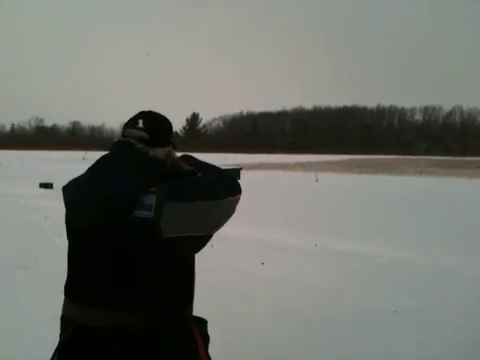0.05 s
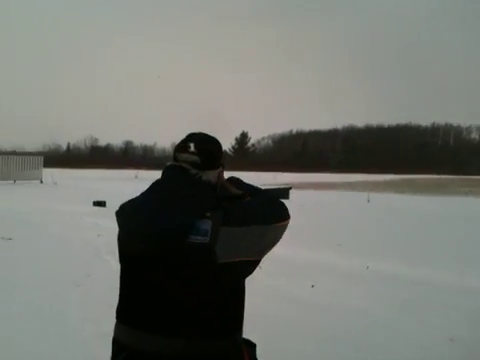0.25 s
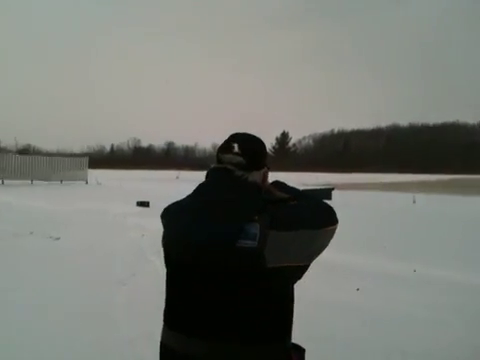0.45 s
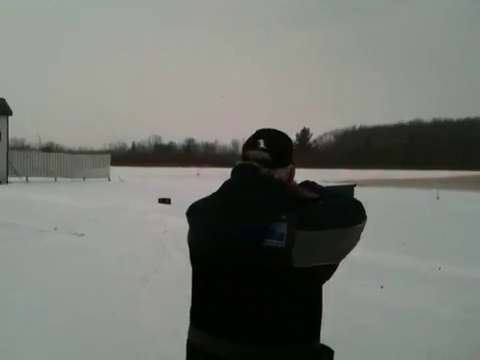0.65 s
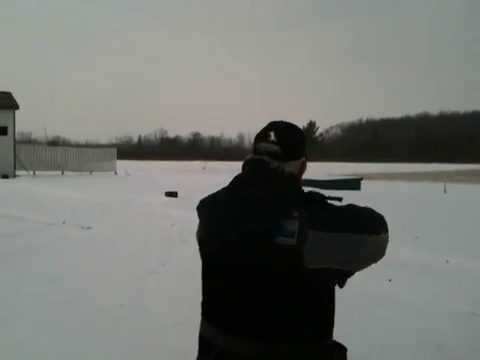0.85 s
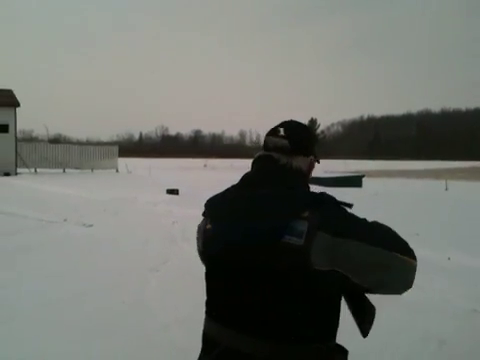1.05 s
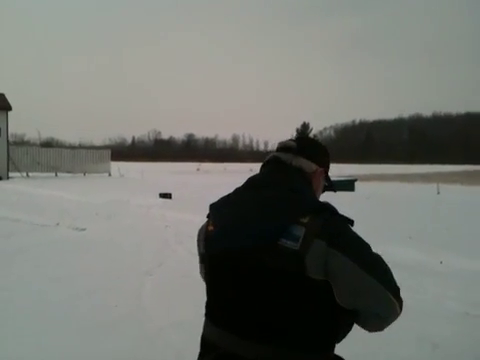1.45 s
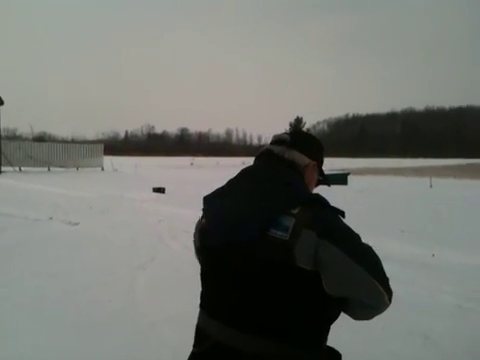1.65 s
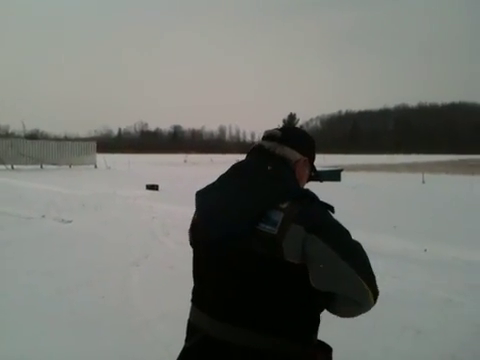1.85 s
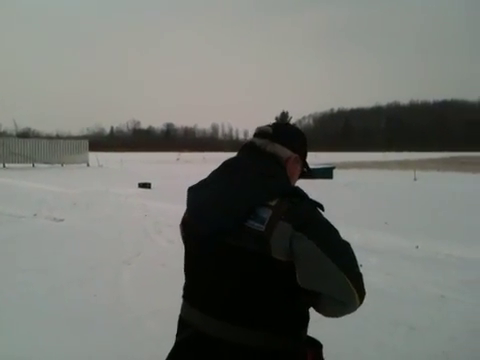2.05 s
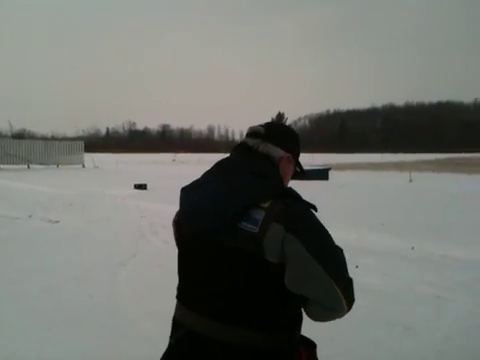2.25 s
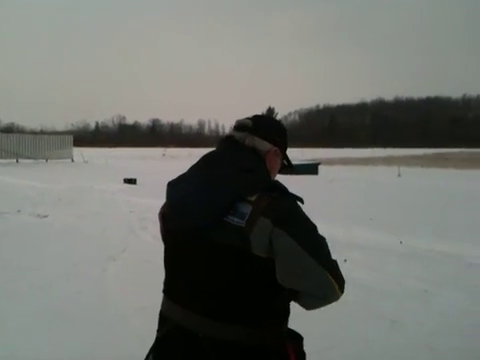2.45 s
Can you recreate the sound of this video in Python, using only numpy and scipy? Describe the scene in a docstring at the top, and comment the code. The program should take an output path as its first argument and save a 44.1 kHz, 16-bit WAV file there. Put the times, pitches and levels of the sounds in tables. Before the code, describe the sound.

One loud shotgun shot outdoors, with slapping echoes, a fading roll and faint gun clicks.

```python
"""A shotgun blast, a sudden pressure pulse, crosses a snowy clay range and overloads the microphone.
Reflection returns it as slaps between the buildings, zings off a ribbed fence, diffuse scatter and
a roll from the far wood, while a thin whistle rings on. Just before the shot the trap's arm clatters.
Afterwards the shooter lowers the gun: friction rustles his jacket and small impacts make the action
click, over faint wind, hiss and hum."""
import sys
import numpy as np
from scipy import signal
from scipy.fft import rfft, irfft
from scipy.io import wavfile

SR = 44100
rng = np.random.default_rng(int(sys.argv[2]) if len(sys.argv) > 2 else 0)


def int16_out(signal):
    """Quantize to a 16-bit WAV file."""
    q = np.round(np.clip(np.atleast_2d(signal).T, -1, 1) * 32767)
    wavfile.write(sys.argv[1], SR, q.astype(np.int16))


N = 110250
T = np.arange(N) / SR
BIN_HZ = np.arange(N // 2 + 1) * SR / N


def from_db(db):
    """Amplitude ratio: tenfold for every 20 dB."""
    return 10 ** (np.asarray(db) / 20)


def unit_rms(x):
    """Normalisation to unit mean power."""
    return x / np.sqrt(np.mean(x ** 2) + 1e-20)


def level(rows, column=1):
    """Gain over time, by linear interpolation in decibels."""
    rows = np.array(rows)
    return from_db(np.interp(T, rows[:, 0], rows[:, column]))


def at_hz(points, hz):
    """Interpolation on a logarithmic frequency axis."""
    points = np.array(points)
    return np.interp(np.log(hz + 1e-6), np.log(points[:, 0]), points[:, 1])


def drift(rate_hz):
    """Random fluctuation: low-passed noise of unit rms."""
    return unit_rms(irfft(rfft(rng.standard_normal(N)) / (1 + (BIN_HZ / rate_hz) ** 2), N))


def noise(spectrum, resonances=(), bass_db=0, treble_db=0):
    """Source and filter: white noise shaped by a spectrum and resonances at unit power, then shelved."""
    peaks_db = sum(boost / (1 + (2 * (BIN_HZ - hz) / width) ** 2) for hz, width, boost in resonances)
    colour = unit_rms(from_db(at_hz(spectrum, BIN_HZ) + peaks_db))
    shelves_db = bass_db / (1 + (BIN_HZ / 450) ** 4) + treble_db * (1 - 1 / (1 + (BIN_HZ / 3800) ** 4))
    return irfft(rfft(rng.standard_normal(N)) * colour * from_db(shelves_db), N)


def envelope(start, attack, hold, t60):
    """Linear rise, hold, then exponential damping by 60 dB in t60 seconds."""
    age = T - start
    decay = np.exp(-np.log(1000) * np.clip((age - attack - hold) / t60, 0, 2))
    return np.clip(age / attack, 0, 1) * decay


def arrivals(rows, spectrum, resonances, attack):
    """Multipath propagation: each path delivers a noise burst with its own delay and tone balance."""
    return sum(from_db(db) * envelope(start, attack, hold, t60) * noise(spectrum, resonances, bass, treble)
               for start, db, hold, t60, bass, treble in rows)


def wave_packets(rows, pitch_spread):
    """Narrow-band pulses: tones of randomly wandering pitch under Gaussian envelopes."""
    out = 0
    for centre, db, hz, sigma in rows:
        phase = 2 * np.pi * np.cumsum(hz * (1 + pitch_spread * drift(hz / 4))) / SR
        swell = np.exp(-.5 * ((T - centre) / sigma) ** 2)
        out = out + from_db(db) * swell * np.sqrt(2) * np.sin(phase)
    return out


# Spectra of wind and hiss: (frequency [Hz], relative level [dB])
WIND_SPECTRUM = [(20, -32), (55, -22), (85, -11), (125, -0.5), (200, -3), (400, -3.5), (750, -2),
                 (1400, -11), (2200, -15), (4000, -35.5), (16000, -46.5)]
HISS_SPECTRUM = [(40, -32.5), (120, -8.5), (400, -2), (900, -2), (1500, -2), (2000, -0.5), (2500, -0.5),
                 (3300, -6.5), (4000, -12.5), (6000, -10.5), (8000, -9.5), (11000, -19.5), (16000, -24)]
# Hiss, which sinks after the shot and recovers: (time [s], level [dB])
HISS_LEVEL = [(0, -59), (0.15, -63), (0.22, -56), (0.30, -75), (1.45, -74.5), (1.7, -60), (2.1, -63.5),
              (2.5, -67)]

def background():
    """Superposition of faint, fluctuating wind noise, broadband hiss and a low hum."""
    wind = from_db(-61) * noise(WIND_SPECTRUM) * from_db(.8 * drift(12))
    hiss = level(HISS_LEVEL) * noise(HISS_SPECTRUM)
    hum = from_db(-72) * np.sqrt(2) * np.sin(2 * np.pi * 120.6 * T)
    return wind + hiss + hum


# Rustle of the cloth: (time [s], level [dB]) and (frequency [Hz], relative level [dB])
RUSTLE_LEVEL = [(1.48, -95), (1.58, -61), (1.7, -61.5), (1.79, -58.5), (1.84, -52), (1.93, -50.5),
                (1.99, -48), (2.04, -54), (2.09, -56), (2.17, -58.5), (2.24, -53), (2.28, -63),
                (2.34, -62.5), (2.40, -64.5)]
RUSTLE_SPECTRUM = [(40, -35), (120, -14), (600, 3), (1400, -2), (1950, -1), (2450, 1.5), (3000, -3),
                   (4500, -8.5), (6500, -9.5), (8200, -11.5), (10500, -9), (13000, -18), (16000, -28)]
# Modes of the sliding steel: (frequency [Hz], width [Hz], boost [dB])
STEEL_MODES = [(2490, 170, 7), (3000, 120, 4), (3650, 250, 4), (4400, 300, 3)]

def jacket_rustle():
    """Friction: the gun slides along the sleeve, making rough noise that faintly rings the steel."""
    return level(RUSTLE_LEVEL) * noise(RUSTLE_SPECTRUM, STEEL_MODES) * from_db(1.5 * drift(120))


# Impacts in the gun: (time [s], level [dB], t60 [s], ring frequency [Hz], knock re ring [dB])
GUN_CLICKS = [(1.527, -47.5, 0.022, 4450, -1), (1.5392, -47, 0.037, 4350, -13),
              (1.8503, -54.5, 0.041, 3700, 6), (1.872, -55.5, 0.036, 4400, 3),
              (1.9443, -48, 0.013, 4400, 3), (1.9980, -38, 0.011, 4480, -19),
              (2.1813, -49, 0.036, 2600, 6.5), (2.2056, -52, 0.085, 4700, -3),
              (2.218, -53, 0.068, 4500, -1), (2.2370, -43, 0.028, 3800, -0.5),
              (2.3142, -57.5, 0.069, 2950, 11), (2.335, -54, 0.067, 4350, 6),
              (2.4877, -46.5, 0.022, 4620, -10)]
# Broad knock: (frequency [Hz], relative level [dB])
KNOCK_SPECTRUM = [(60, -27), (300, -4), (750, 5.5), (1700, -14), (2450, 6.5), (3200, -11), (4200, -5.5),
                  (7000, -9), (11000, -12), (16000, -28)]
# Ring of a click: (multiple of the ring frequency [1], relative level [dB])
RING_SPECTRUM = [(.3, -22), (.55, -10), (.72, -8), (.9, -5.5), (1.0, 2), (1.09, -2), (1.2, -23), (2.5, -22),
                 (4.0, -42)]

def gun_clicks():
    """Impact excitation: steel parts meet, each with a damped ring and a broadband knock."""
    knock, out = noise(KNOCK_SPECTRUM), 0
    for start, db, t60, hz, knock_db in GUN_CLICKS:
        ring = noise(np.array(RING_SPECTRUM) * [hz, 1])
        out = out + from_db(db) * envelope(start, .00066, .001, t60) * (ring + from_db(knock_db) * knock)
    return out


# Clatter of the trap: (frequency [Hz], relative level [dB])
TRAP_SPECTRUM = [(60, -25), (200, -8.5), (680, -19), (760, 7.5), (850, -14.5), (1300, -7.5), (1750, 2.5),
                 (2300, -10.5), (2800, -9), (5000, -20), (6200, -18.5), (11000, -27.5), (16000, -36)]

def trap_clatter():
    """Damped vibration: the throwing arm clatters in its house."""
    return from_db(-42) * envelope(start=.109, attack=.006, hold=.014, t60=.2) * noise(TRAP_SPECTRUM)


# Roll from the tree line: (time [s], level [dB]) and (frequency [Hz], relative level [dB])
ROLL_LEVEL = [(0.75, -66), (0.89, -55.5), (0.96, -45.5), (1.02, -42), (1.08, -40), (1.2, -42),
              (1.32, -44.5), (1.40, -43.5), (1.50, -45.5), (1.58, -50), (1.8, -58), (2.1, -49.5),
              (2.3, -53), (2.5, -61)]
ROLL_SPECTRUM = [(60, -34), (250, -24.5), (500, -13.5), (850, 2), (1400, 3), (2000, -4), (2800, -6),
                 (4000, -20.5), (7000, -27.5), (12000, -40.5), (16000, -48.5)]
TAIL_START_S = .238  # onset of roll, whistle and scatter

def far_wood(dulling_db_per_s=21.5, dulling_from_s=1):
    """Absorption along the path: the wood's grainy return is duller the farther it has travelled."""
    roll = noise(ROLL_SPECTRUM)
    low = irfft(rfft(roll) / (1 + (BIN_HZ / 2250) ** 2) ** 2, N)
    treble_gain = from_db(-dulling_db_per_s * np.maximum(T - dulling_from_s, 0))
    dulled = low + treble_gain * (roll - low)
    return level(ROLL_LEVEL) * (T > TAIL_START_S) * dulled * from_db(1.4 * drift(50))


# Partials of the whistle: (time [s], fundamental level [dB], octave level [dB])
WHISTLE_LEVELS = [(0.37, -54.5, -52.5), (0.405, -26.5, -35), (0.45, -60, -43), (0.48, -34, -51),
                  (0.525, -35.5, -43), (0.63, -42, -43), (0.675, -31, -38.5), (0.72, -33, -45),
                  (0.80, -39, -49.5), (0.84, -35, -47.5), (0.89, -48.5, -59.5), (0.93, -48, -60.5),
                  (1.06, -65, -85), (1.13, -96, -100)]

def whistle(pitch_hz=5528, beat_hz=125.5):
    """Beating: a thin tone and its octave settle upward, each interfering with a weaker neighbour."""
    flat_hz = 65 * np.exp(-np.maximum(T - .41, 0) / .05)
    phase = 2 * np.pi * np.cumsum(pitch_hz - flat_hz + 4 * drift(25)) / SR
    beat = 1 + from_db(-17.5) * np.exp(2j * np.pi * beat_hz * T)
    tones = 0
    for k in (1, 2):
        flutter = k * .2 * (drift(90) + 1j * drift(90))  # in both amplitude and phase
        tones = tones + level(WHISTLE_LEVELS, column=k) * np.exp(1j * k * phase) * (beat + flutter)
    shimmer = from_db(1.05 * drift(35))
    return np.sqrt(2) * tones.real * shimmer * (T > TAIL_START_S)


# Low pulses: (peak time [s], level [dB], frequency [Hz], Gaussian sigma [s])
LOW_THUDS = [(0.245, -14, 255, 0.0065), (0.545, -51.5, 140, .018), (0.615, -55, 280, 0.017),
             (0.699, -38.5, 402.6, 0.0024), (0.711, -31, 480.8, 0.0055), (2.345, -59.5, 270, 0.018)]

def thuds():
    """Pulses of only a few cycles are heard as thuds, not pitches; the first is from the muzzle."""
    return wave_packets(LOW_THUDS, pitch_spread=.2)


# Returns from the fence: (peak time [s], level [dB], frequency [Hz], Gaussian sigma [s])
FENCE_ZINGS = [(0.366, -18.5, 1050, .007), (0.380, -22, 2300, 0.0046), (0.391, -16.5, 800, 0.0022),
               (0.495, -12, 2850, 0.0046)]

def fence_zings():
    """Periodic reflection: the fence's ribs return the shot as brief, pitched metallic zings."""
    return wave_packets(FENCE_ZINGS, pitch_spread=.055)


# Early scatter: (frequency [Hz], relative level [dB]) and (frequency [Hz], t60 [s])
EARLY_SPECTRUM = [(25, -37), (75, -28.5), (130, -7), (260, -4.5), (500, 5), (900, 0), (1400, 1), (2600, -1),
                  (4500, -7.5), (7000, -5.5), (11000, -7.5), (16000, -28)]
EARLY_T60 = [(40, .5), (150, .5), (400, .68), (1000, 1), (2600, 1.0), (5000, .85), (9000, .68), (16000, .5)]
# Late scatter: (time [s], level [dB]) and (frequency [Hz], relative level [dB])
LATE_LEVEL = [(0.33, -57), (0.365, -22), (0.42, -23), (0.48, -13), (0.505, -21), (0.52, -33), (0.56, -27.5),
              (0.63, -45.5), (0.72, -37.5), (0.82, -45.5), (0.89, -55.5), (1.1, -110)]
LATE_SPECTRUM = [(60, -41), (300, -16), (700, -6.5), (1400, 3.5), (2700, -1.5), (4200, -8), (8000, -17.5),
                 (12000, -32.5), (16000, -41)]
# Resonances of both the blast and its scatter: (frequency [Hz], width [Hz], boost [dB])
SHOT_RESONANCES = [(1412, 130, 4), (1850, 27, 6.5), (2600, 100, 7), (3830, 170, 3), (6410, 300, 5.5),
                   (6810, 80, 7)]

def scatter():
    """Diffuse reflection from ground and fence: bass and treble die first, and more swells in late."""
    spectrum, early = rfft(noise(EARLY_SPECTRUM, SHOT_RESONANCES)), 0
    centres_hz = np.geomspace(40, 16000, 14)
    band_index = np.interp(np.log(BIN_HZ + 1), np.log(centres_hz), np.arange(len(centres_hz)))
    for k, hz in enumerate(centres_hz):
        band = irfft(spectrum * np.maximum(1 - abs(band_index - k), 0), N)  # triangular passband
        early = early + band * envelope(TAIL_START_S, attack=.0006, hold=0, t60=at_hz(EARLY_T60, hz))
    late = level(LATE_LEVEL) * (T > TAIL_START_S) * noise(LATE_SPECTRUM, SHOT_RESONANCES)
    roughness = from_db(2.5 * drift(130))
    brief_dip = from_db(-21 * np.exp(-.5 * ((T - .5) / .0064) ** 2))
    return (from_db(-13) * early + late) * roughness * brief_dip


# Echoes: (time [s], level [dB], hold [s], t60 [s], bass shelf [dB], treble shelf [dB])
ECHO_ARRIVALS = [(0.4335, 0, 0.003, 0.038, -2, -4), (0.4590, -3.5, 0.0031, 0.029, 3, 6),
                 (0.4720, -21, 0.033, 0.17, -28, 6), (0.6710, -19, 0.0018, .025, -25, -16),
                 (0.6775, -15, 0.0013, 0.033, -17, -13), (0.6960, -25, 0.0024, 0.023, -10, -5),
                 (0.7035, -22, .003, 0.062, -5.5, -8), (0.9090, -35.5, 0.019, 0.19, -6.5, -30)]
# Their spectrum: (frequency [Hz], relative level [dB])
ECHO_SPECTRUM = [(25, -44), (80, -30), (150, -18), (350, -7.5), (600, -4), (850, -5), (1100, -7.5),
                 (1430, 5.5), (1900, -11.5), (2600, 0), (3300, -10), (4200, -11), (5200, -12), (7500, -12),
                 (11000, -20), (16000, -49)]
# Hollow ring of the buildings: (frequency [Hz], width [Hz], boost [dB])
BUILDING_RESONANCES = [(910, 120, 7.5), (1360, 200, 5.5), (1533, 200, 4), (2550, 170, 4.5), (4110, 400, 8)]

def building_echoes():
    """Repeated reflection: the shot slaps between the buildings, weaker and duller on each round."""
    return arrivals(ECHO_ARRIVALS, ECHO_SPECTRUM, BUILDING_RESONANCES, attack=.0033)


# Blast arrivals: (time [s], level [dB], hold [s], t60 [s], bass shelf [dB], treble shelf [dB])
BLAST_ARRIVALS = [(0.2290, -24.5, 0.0042, .02, -4.5, 5), (0.2323, -5, 0.0022, .012, 0, 4.5),
                  (0.2386, -5, 0.0058, .05, 5.5, 1), (0.2565, -3.5, 0.0044, .04, -7.5, 6.5),
                  (0.2715, -3.5, .010, .045, -5.5, 0), (0.3005, -16.5, 0.0095, .035, -3, -3),
                  (0.3255, -5.5, 0.0057, 0.01, -1, -1.5)]
# Their spectrum: (frequency [Hz], relative level [dB])
BLAST_SPECTRUM = [(25, -29.5), (75, -28), (130, -0.5), (250, -2.5), (400, -4.5), (800, 3), (1400, 2),
                  (2500, -0.5), (4800, -5), (7000, -5), (11000, -9), (16000, -19.5)]

def muzzle_blast():
    """Impulsive radiation: a steep broadband pulse leaves the muzzle, trailed by its nearest reflections."""
    return arrivals(BLAST_ARRIVALS, BLAST_SPECTRUM, SHOT_RESONANCES, attack=.0006)


def scene():
    """Linear superposition of the shot, its returns and the small sounds around it, in mono."""
    shot = muzzle_blast() + building_echoes() + scatter() + fence_zings() + thuds() + far_wood()
    return (shot + whistle() + trap_clatter() + gun_clicks() + jacket_rustle() + background())[None]


def record(dry, ceiling=.61, knee=3.5):
    """Saturation and band limiting: the microphone overloads, then deep bass and top treble are cut."""
    clipped = dry / (1 + abs(dry / ceiling) ** knee) ** (1 / knee)
    bass_cut = signal.sosfilt(signal.butter(1, 45, "high", fs=SR, output="sos"), clipped)
    low_pass = signal.firwin(255, 15900, fs=SR, window="blackman")
    return signal.fftconvolve(bass_cut, low_pass[None], "same")


dry = scene()
out = record(dry)
int16_out(out)
```